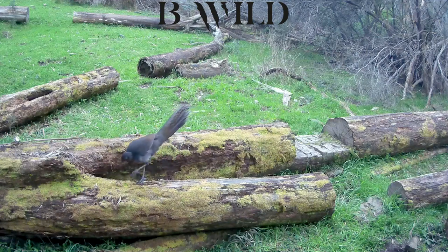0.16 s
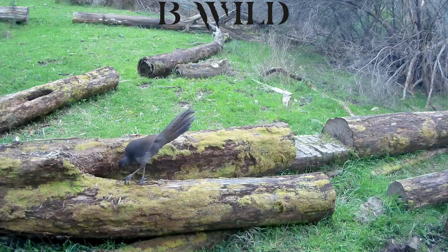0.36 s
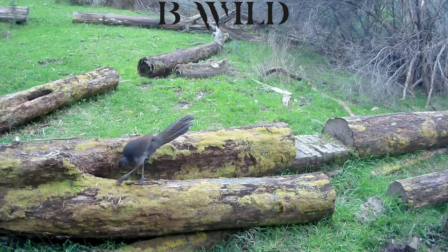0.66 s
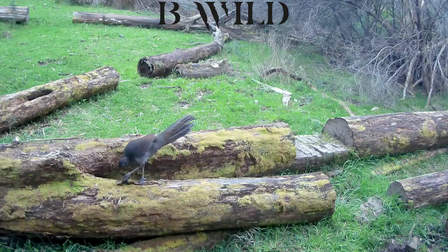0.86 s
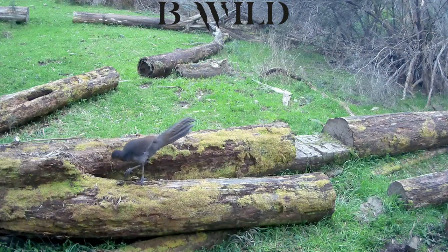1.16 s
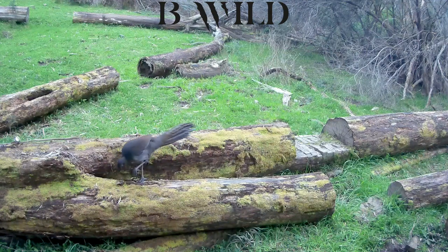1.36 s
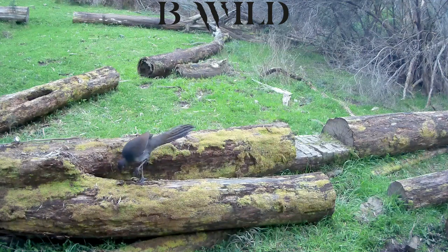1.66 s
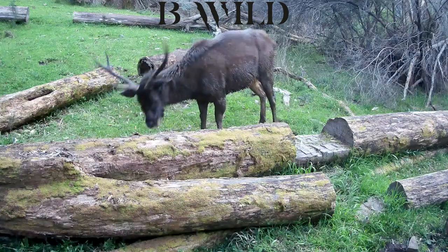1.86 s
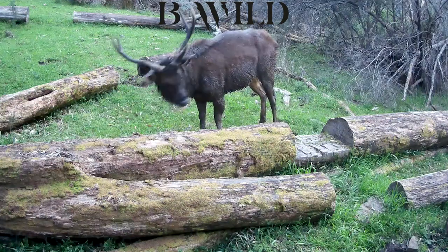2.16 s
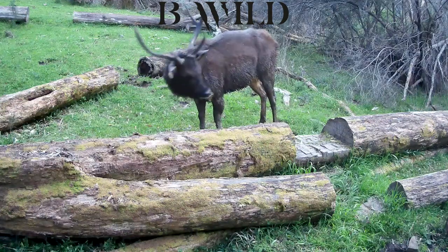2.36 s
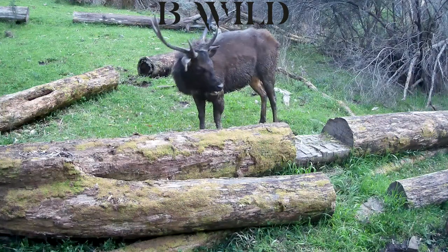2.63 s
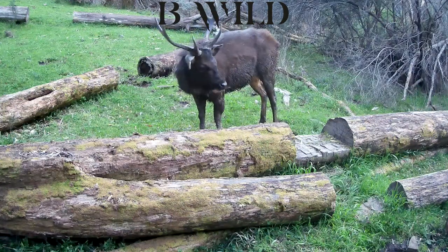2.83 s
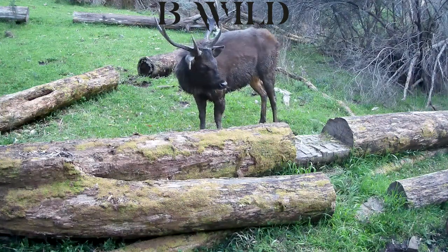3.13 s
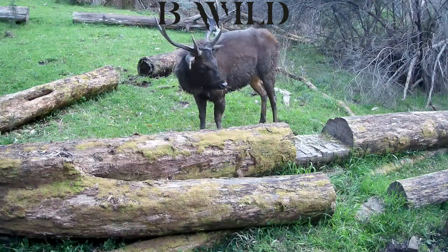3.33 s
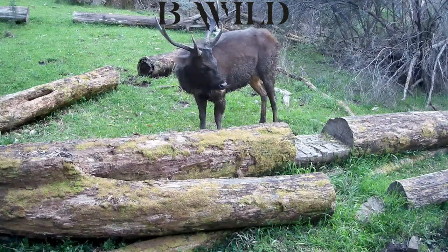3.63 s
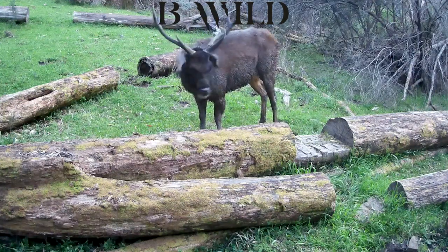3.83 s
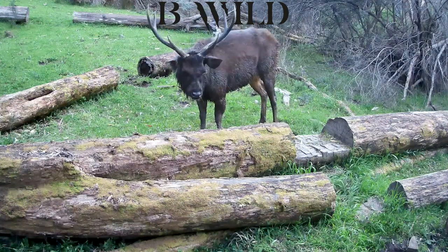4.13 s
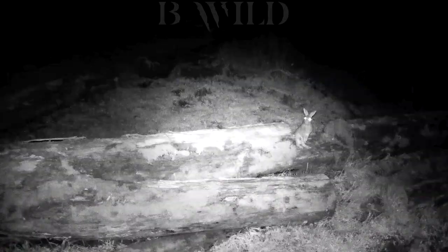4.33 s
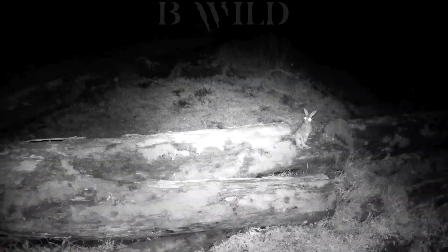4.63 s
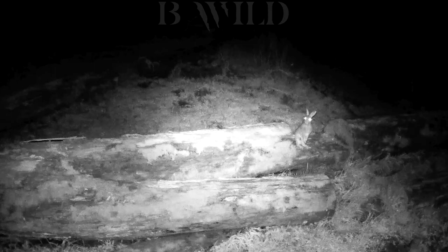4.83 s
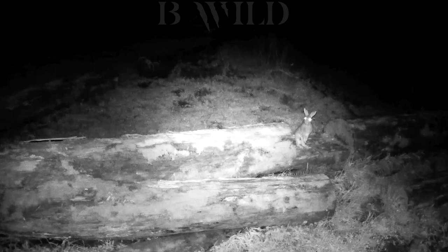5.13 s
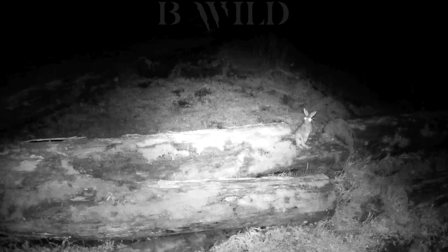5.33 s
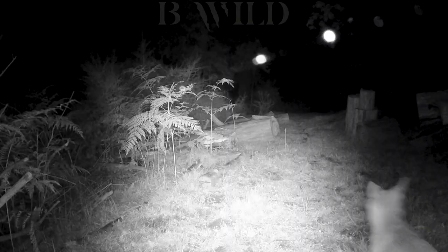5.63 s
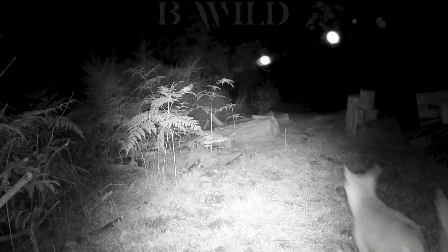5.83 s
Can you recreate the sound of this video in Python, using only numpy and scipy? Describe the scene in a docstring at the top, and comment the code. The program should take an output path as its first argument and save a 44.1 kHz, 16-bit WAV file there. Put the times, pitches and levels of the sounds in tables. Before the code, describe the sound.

Three outdoor shots heard through a small, hissy fixed microphone. First, near stillness with a frayed descending call and low soft thuds. Next, fuller air with dull rumbles, two scooping chips and a trill of about six upsweeps a second, growing from faint to dominating with woodland echo. Last, abruptly, a mid-range night rush with far frogs throbbing, faint insect and whine, and two dry wood ticks near the end.

```python
"""A loud trill of rising whistles swells and echoes among the trees, from a trail camera in a forest clearing.
Three shots are joined by hard cuts. By day: a thin falling call, then chips, whistles and the trill over a broad
noise bed, all bird notes being frequency-modulated tones with scattered echoes. By night a far frog chorus (pulsed
tones) throbs over a steady rush (shaped noise), with a thin insect band and the whine of the camera's electronics.
Knocks of wood, as decaying tones, fall in the first shot and at night."""
import sys
import numpy as np
from scipy import signal
from scipy.fft import rfft, irfft, next_fast_len
from scipy.io import wavfile

SR = 44100
rng = np.random.default_rng(int(sys.argv[2]) if len(sys.argv) > 2 else 0)


def unload_audio(sound):
    """Save the sound as a 16-bit wav file, at the path given as the first command line argument."""
    columns = np.transpose(np.atleast_2d(sound))
    # keep every value between -1 and 1, then stretch to whole-number steps
    steps = np.round(np.clip(columns, -1, 1) * 32767)
    wavfile.write(sys.argv[1], SR, steps.astype(np.int16))


N = 264159

# range of a trill note: lowest pitch, knee where the curl becomes an arch, and top
LOW_HZ, KNEE_HZ, TOP_HZ = 1915, 2826, 3975


def from_db(db):
    """Amplitude gain is ten to the power of the level over 20 dB."""
    return 10 ** (np.asarray(db) / 20)


def rms_one(x):
    """Normalisation: dividing by the root mean square gives unit power."""
    return x / np.sqrt(np.mean(x ** 2) + 1e-20)


def clock():
    """Uniform sampling: the time of every sample in seconds."""
    return np.arange(N) / SR


def level(rows):
    """Envelope: gain from a curve of (t/s, level/dB), linear in decibels."""
    return from_db(np.interp(clock(), *np.transpose(rows)))


def noise(spectrum):
    """Spectral shaping: white noise weighted by (f/Hz, level/dB) points, at unit rms."""
    hz, db = np.transpose(spectrum)
    size = next_fast_len(N)
    bins = np.maximum(np.fft.rfftfreq(size, 1 / SR), 1)
    gain = from_db(np.interp(np.log(bins), np.log(hz), db))
    shaped = irfft(rfft(rng.standard_normal(size)) * gain, size)
    return rms_one(shaped[:N])


def band_noise(low_hz, high_hz, order):
    """Band-pass filtering: white noise confined between two edges, at unit rms."""
    band = signal.butter(order, [low_hz, high_hz], "band", fs=SR, output="sos")
    return rms_one(signal.sosfilt(band, rng.standard_normal(N)))


def drift(rate):
    """Random fluctuation: white noise through a double-pole low-pass at rate (Hz), at unit rms."""
    pole = np.exp(-2 * np.pi * rate / SR)
    slow = signal.lfilter([1], [1, -2 * pole, pole * pole], rng.standard_normal(N + SR))
    return rms_one(slow[SR:])  # the filter settles in the discarded first second


def swell(attack_s, release_s, edge_db, count=41):
    """Parabolic envelope: times around a note's peak and its level in dB, falling to edge_db at both ends."""
    reach = np.linspace(-1, 1, count)
    return reach * np.where(reach < 0, attack_s, release_s), edge_db * reach ** 2


def syrinx(s, hz, db, partials=((1, 0),), waver=0.0073, waver_s=0.0013):
    """Frequency modulation: phase integrates a slightly trembling pitch; partials are exact multiples."""
    t, out = clock(), np.zeros(N)
    on = (t >= s[0]) & (t <= s[-1])
    knots = np.arange(s[0], s[-1] + waver_s, waver_s)
    tremble = np.interp(t[on], knots, rng.standard_normal(len(knots)))
    pitch = np.interp(t[on], s, hz) * (1 + waver * tremble)
    phase = 2 * np.pi * np.cumsum(pitch) / SR
    tone = sum(from_db(partial_db) * np.sin(round(k) * phase) for k, partial_db in partials)
    gain = np.sqrt(2) * from_db(np.interp(t[on], s, db))
    out[on] = gain * tone * signal.windows.tukey(on.sum(), .1)
    return out


def forest(x, wet_db, t60_s=0.45, first_s=0.0055, grain_db=2.7):
    """Multiple scattering: two near echoes and an uneven, exponentially dying return from many trunks."""
    # echoes off ground and logs: delay t/s, level/dB
    near_echoes = [(.0043, -13), (.0125, -14.5)]
    t = np.arange(SR) / SR
    trunks = rng.standard_normal(SR) * from_db(grain_db * drift(150)[:SR])
    onset = np.clip(t / first_s - .5, 0, 1)
    scatter = trunks * from_db(-60 * t / t60_s) * onset
    response = from_db(wet_db) * scatter / np.sqrt(np.sum(scatter ** 2))
    for delay, db in near_echoes:
        response[int(delay * SR)] += from_db(db)
    return signal.fftconvolve(x, response)[:N]


def first_air(air_db=-46.5):
    """Broadband noise: the air of the first shot, strongest at low frequencies."""
    # spectrum of the air: f/Hz, relative level per Hz/dB
    air_spectrum = [(12, -36), (20, -1.5), (129, -1), (271, -5.5), (301, -7.5), (344, -8), (744, -11.5),
                    (827, -11.5), (1230, -13.5), (3480, -16.5), (4780, -17), (11500, -17.5), (15000, -51),
                    (22000, -120)]
    return from_db(air_db) * noise(air_spectrum)


def hiss(hiss_db=-0.3):
    """Band-limited noise: the camera's hiss near the top of the range by day."""
    # course of the hiss, offset by hiss_db: t/s, level/dB
    hiss_levels = [(0.0, -50.5), (1.42, -49.5), (2.07, -52.5), (2.57, -50), (3.07, -53.5), (3.96, -53.5),
                   (4.25, -49)]
    return from_db(hiss_db) * level(hiss_levels) * band_noise(12150, 16000, order=12)


def falling_call(wet_db=-9, rough_db=-22, rough_hz=350, echo_s=.036, echo_db=-8, edge_db=-22):
    """Amplitude modulation: random roughness frays a falling tone towards its end; an echo off the logs doubles it."""
    # partials of the call, without the fundamental: multiple, level/dB
    call_partials = [(2, -13), (3, -25), (4, -3.5)]
    start_s, attack_s, release_s = .168, 0.062, 0.063
    # pitch of the silent fundamental
    from_hz, fall_hz_per_s, fundamental_db = 1403, 2300, -37.5
    age, shape_db = swell(attack_s, release_s, edge_db)
    s = start_s + attack_s + age
    hz = from_hz - fall_hz_per_s * (s - start_s)
    fray = from_db(np.interp(clock(), [s[0], s[-1]], [rough_db, 0]))
    call = syrinx(s, hz, fundamental_db + shape_db, call_partials, waver=0.015)
    call = call * (1 + fray * drift(rough_hz))
    echo = from_db(echo_db) * np.interp(clock() - echo_s, clock(), call)
    return call + echo + forest(call, wet_db)


def knocks(rough=0.26, attack_s=0.0012):
    """Damped resonance: struck twigs and wood ring briefly and unevenly, each at one pitch."""
    # soft knocks: t/s, level/dB before attack and roughness, f/Hz, decay by 60 dB t/s
    wood_knocks = [(.513, -39, 102, .1), (1.397, -36, 187, 0.11), (5.442, -29.5, 2590, 0.042),
                   (5.589, -22.5, 1650, 0.03)]
    out = np.zeros(N)
    for at, db, hz, t60 in wood_knocks:
        age = np.maximum(clock() - at, 0)
        decay = from_db(db - np.minimum(60 * age / t60, 200))
        attack = np.minimum(age / attack_s, 1)
        out += decay * attack * np.sin(2 * np.pi * hz * age) * (1 + rough * drift(hz / 5))
    return out


def whistles(wet_db=-6.0, edge_db=-19, peak_share=.62, tremble=0.0051, tremble_per_octave=0.12):
    """Linear glides: pure tones swell and fade, trembling more the wider they glide."""
    # whistles of birds near and far: start t/s, length t/s, start f/Hz, end f/Hz, level/dB
    plain_whistles = [(1.79, 0.17, 2093, 2194, -59), (2.31, 0.043, 3700, 4570, -52.5),
                      (2.647, .11, 5770, 5750, -57), (2.885, 0.032, 6770, 6760, -52),
                      (2.876, .26, 1646, 1502, -50.5), (2.956, 0.041, 4600, 3700, -34.5),
                      (2.965, .024, 3756, 4400, -35), (3.07, 0.12, 5900, 5700, -57),
                      (3.113, .059, 1473, 1938, -42), (3.173, 0.38, 5810, 5620, -54),
                      (3.333, .066, 6850, 6500, -53.5), (3.36, .18, 6850, 6620, -50),
                      (3.436, 0.22, 8500, 7900, -58.5), (3.583, .048, 6400, 6480, -40),
                      (4.14, 0.048, 1844, 1534, -55)]
    from_peak, shape_db = swell(peak_share, 1 - peak_share, edge_db)
    share = peak_share + from_peak  # share of the note's length
    notes = 0
    for at, length, from_hz, to_hz, db in plain_whistles:
        hz = from_hz + (to_hz - from_hz) * share
        waver = tremble + tremble_per_octave * abs(np.log2(to_hz / from_hz))
        notes = notes + syrinx(at + length * share, hz, db + shape_db, waver=waver)
    return notes + forest(notes, wet_db)


def calm_air(air_db=-50.5):
    """Broadband noise: the calmer air of the second shot."""
    # spectrum of the air: f/Hz, relative level per Hz/dB
    calm_spectrum = [(20, 0), (70, -4), (150, -2.5), (280, -8.5), (600, -17), (1500, -15.5), (4000, -18.5),
                     (7000, -17), (12000, -21), (13000, -66)]
    return from_db(air_db) * noise(calm_spectrum)


def noise_bed(peak_s=3.7, peak_db=-47, rise_db_per_s=7, fall_db_per_s=15):
    """Exponential envelope: broad shaped noise slowly rises and sinks during the trill."""
    # spectrum of the noise bed: f/Hz, relative level per Hz/dB
    bed_spectrum = [(20, -12), (70, 4), (130, 1.5), (280, 0.5), (470, 0.5), (700, -2), (1300, -5.5),
                    (2500, -6.5), (4600, -11), (8000, -18), (16000, -39)]
    t = clock()
    below_peak_db = np.maximum(rise_db_per_s * (peak_s - t), fall_db_per_s * (t - peak_s))
    return from_db(peak_db - below_peak_db) * noise(bed_spectrum)


def rumbles(low_hz=134, high_hz=205, edge_db=-19):
    """Amplitude modulation: a narrow band of low noise rises and sinks in soft, dull swells."""
    # rumbles: middle t/s, length t/s, level/dB
    rumble_swells = [(1.977, 0.25, -47), (2.612, 0.3, -50.5), (2.79, 0.077, -46), (2.967, .16, -50.5),
                     (3.18, 0.21, -49.5), (3.44, .5, -46), (3.864, 0.32, -48), (4.075, 0.23, -44)]
    gain = 0
    for at, length, db in rumble_swells:
        age, shape_db = swell(length / 2, length / 2, edge_db)
        gain = gain + np.interp(clock(), at + age, from_db(db + shape_db), left=0, right=0)
    return gain * band_noise(low_hz, high_hz, order=2)


def chips(wet_db=-13, flick_s=0.007, flick_low_hz=1850, flick_high_hz=2300, flick_edge_db=-8, edge_db=-23):
    """Vocal-tract filtering: a small bird flicks, then scoops; its throat favours the third partial."""
    # partials of a chip, without the fundamental: multiple, level/dB
    throat_partials = [(2, -7), (3, -0.5), (4, -26), (5, -23)]
    # scooping chips: t/s, level/dB, pitch factor, length factor
    scoop_notes = [(2.055, -34.5, 1.0, 0.93), (2.196, -42.5, 1.015, .85)]
    # quick upward flicks that lead into the chips: t/s, level/dB
    flick_notes = [(1.985, -49), (2.013, -47), (2.125, -48), (2.159, -50)]
    # the silent fundamental scoops down to lowest_hz and up again, loudest at the bottom
    lowest_hz, scoop_hz_per_s2, attack_s, release_s = 2050, 480000, .03, .02
    s, shape_db = swell(attack_s, release_s, edge_db)
    hz = lowest_hz + scoop_hz_per_s2 * s ** 2
    notes = 0
    for at, db, pitch, length in scoop_notes:
        notes = notes + syrinx(at + s * length, hz * pitch, db + shape_db, throat_partials)
    span = np.array([-1, 0, 1])
    rise = np.linspace(flick_low_hz, flick_high_hz, len(span))
    for at, db in flick_notes:
        notes = notes + syrinx(at + flick_s * span, rise, db + flick_edge_db * abs(span), throat_partials)
    return notes + forest(notes, wet_db)


def trill_note(stretch, edge_db=-30, count=120):
    """Exponential glide: age from the knee, pitch and level of an upsweep; stretch scales the part above the knee."""
    curl_s, arch_s = .0175, 0.028
    # a lead-in before the knee, a hold after it, then a release
    lead_s, attack_s, hold_s, release_s = .05, 0.0077, 0.029, 0.025
    # the voice gains strength with pitch
    knee_db, db_per_octave = -12.5, 25.5
    # it is muted in the lead-in and opens suddenly just before the knee
    muted_db, open_before_knee_s, opening_s = -7.5, 0.0078, .003
    s = np.linspace(-lead_s, hold_s + release_s, count)
    below = s < 0
    curl = LOW_HZ + (KNEE_HZ - LOW_HZ) * np.exp(s / curl_s)
    arch = TOP_HZ - (TOP_HZ - KNEE_HZ) * np.exp(-s / arch_s)
    hz = np.where(below, curl, arch)
    voice_db = knee_db + db_per_octave * np.log2(hz / KNEE_HZ)
    lead_in = np.clip((-s - open_before_knee_s) / opening_s, 0, 1)
    attack = np.maximum(1 - (s + lead_s) / attack_s, 0)
    release = np.maximum((s - hold_s) / release_s, 0)
    db = voice_db + muted_db * lead_in + edge_db * (attack + release) ** 2
    return s * np.where(below, 1, stretch), hz, db


def trill(glide_hz_per_s=32000, beam_db=20.5, beam_hz=3500, turned_away_db=7.5, lazy_db=20,
          straightest=0.77, waver=0.0058, wet_db=-7.5):
    """Directivity: about six upsweeps a second grow louder and arch over, beaming their high pitches forward."""
    # trill notes: knee t/s, level/dB before the voice's own gain with pitch
    upsweeps = [(2.295, -44.5), (2.445, -38.5), (2.602, -26.5), (2.762, -20.5), (2.921, -14),
                (3.082, -10.8), (3.243, -9), (3.401, -8.5), (3.561, -7), (3.721, -7), (3.886, -7)]
    # notes weaker than full voice are shorter; below the lazy level they straighten out
    full_voice_db, shortest_share = -8, 0.79
    lazy_below_db, straighten_per_db = -16, .05
    direct, spread = 0, 0
    for at, note_db in upsweeps:
        effort = from_db(note_db - full_voice_db)
        straight = np.clip((lazy_below_db - note_db) * straighten_per_db, 0, straightest)
        age, hz, db = trill_note(shortest_share + (1 - shortest_share) * effort)
        glide = np.clip(KNEE_HZ + glide_hz_per_s * age, LOW_HZ, TOP_HZ)
        pitch = hz + straight * (glide - hz)
        octaves_down = np.log2(beam_hz / pitch)
        # the first, lazy notes come in softly from below
        loudness = db + note_db - lazy_db * straight * octaves_down
        direct = direct + syrinx(at + age, pitch, loudness, waver=waver)
        # low pitches and the lazy notes spread more into the trees
        spill_db = beam_db * octaves_down + turned_away_db * straight
        spread = spread + syrinx(at + age, pitch, loudness + spill_db, waver=waver)
    return direct + forest(spread, wet_db)


def closing_notes(edge_db=-24, waver=.008, wet_db=-6):
    """Geometric glide: two soft slides, even in octaves and loudest in the middle, close the trill."""
    attack_s, release_s = .029, .032
    age, shape_db = swell(attack_s, release_s, edge_db)
    hz = np.geomspace(2130, 3900, len(age))
    notes = 0
    for start_s, db in [(4.073, -33.5), (4.191, -31)]:
        notes = notes + syrinx(start_s + attack_s + age, hz, db + shape_db, waver=waver)
    return notes + forest(notes, wet_db)


def rush(rush_db=-39):
    """Broadband noise: the steady rush of the night, strongest in the middle range."""
    # spectrum of the rush: f/Hz, relative level per Hz/dB
    rush_spectrum = [(20, -24), (60, -14), (130, -7), (300, -3), (750, 0), (1300, -1.5), (1950, -4),
                     (2600, -4.5), (2850, -11), (3800, -18), (5000, -25), (5800, -25.5), (6600, -38.5),
                     (16000, -37.5)]
    return from_db(rush_db) * noise(rush_spectrum)


def frogs(chorus_db=2.5, pulse_sharpness=0.81, scatter_hz=16, haze_db=-9):
    """Superposition: far frogs pulse at their own rates; distance smears their pitch and fills the gaps."""
    # course of the chorus, offset by chorus_db: t/s, level/dB
    chorus_levels = [(4.32, -45), (4.338, -46.5), (4.48, -39), (4.522, -43), (5.73, -45), (5.794, -42.5),
                     (5.98, -46)]
    # frogs: mean pitch f/Hz, mean pulse rate f/Hz, relative level/dB
    frog_voices = [(2333, 47.5, -4), (2265, 58, 1.5), (2378, 61, -4), (2374, 55, 3.5), (2220, 33, 0.5)]
    voices = 0
    for hz, rate, db in frog_voices:
        beat = np.cumsum(rate * (1 + 0.0398 * drift(2.76))) / SR
        pulses = np.exp(pulse_sharpness * (np.cos(2 * np.pi * beat) - 1))
        phase = 2 * np.pi * np.cumsum(hz + scatter_hz * drift(29.78)) / SR
        voices = voices + from_db(db) * pulses * np.sin(phase)
    haze = from_db(haze_db) * band_noise(2160, 2610, order=2)
    return level(chorus_levels) * from_db(chorus_db) * rms_one(rms_one(voices) + haze)


def insect(low_hz=4130, high_hz=4310, flutter_db=2.5):
    """Narrow-band noise: a faint, grainy thread of insect sound, smeared by distance."""
    # course of the insect's band: t/s, level/dB
    insect_levels = [(4.29, -60), (4.45, -69), (4.9, -69), (5.1, -64), (5.55, -59), (5.7, -61.5),
                     (5.99, -64)]
    flutter = from_db(flutter_db * drift(30))
    return level(insect_levels) * rms_one(flutter * band_noise(low_hz, high_hz, order=2))


def whine(frame_hz=59.742, whine_hz=7796, whine_db=-69.5, tick_hz=5760, tick_db=-57.5, tick_s=0.0011):
    """Periodic restart: the camera's electronics begin a thin tone afresh each frame, with a soft tick mid-frame."""
    age = clock() % (1 / frame_hz)
    tone = from_db(whine_db) * np.sqrt(2) * np.sin(2 * np.pi * whine_hz * age)
    tick_shape = np.exp(-((age - .5 / frame_hz) / tick_s) ** 2)
    tick = from_db(tick_db) * tick_shape * np.sin(2 * np.pi * tick_hz * age)
    return tone + tick


def scene(second_shot_s=1.82, night_s=4.289, cut_fade_s=.002):
    """Superposition within each of three shots, each with its own air and animals."""
    t = clock()
    first = first_air() + falling_call()
    birds = whistles() + chips() + trill() + closing_notes()
    second = calm_air() + noise_bed() + rumbles() + birds
    day = np.where(t < second_shot_s, first, second) + hiss()
    night = rush() + frogs() + insect() + whine()
    dark = np.clip((t - night_s) / cut_fade_s + .5, 0, 1)
    return ((1 - dark) * day + dark * night + knocks())[None]


def record(dry, cutoff_hz=15800):
    """Low-pass filtering: a steep elliptic filter cuts the top."""
    return signal.sosfilt(signal.ellip(12, .1, 80, cutoff_hz, fs=SR, output="sos"), dry)


dry = scene()
out = record(dry)
unload_audio(out)
```